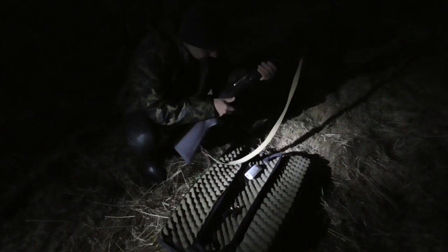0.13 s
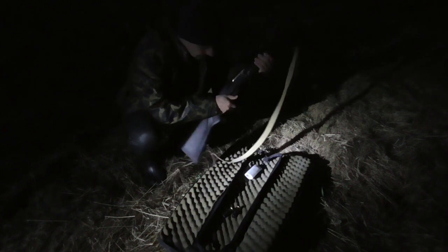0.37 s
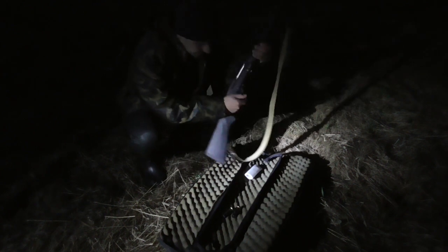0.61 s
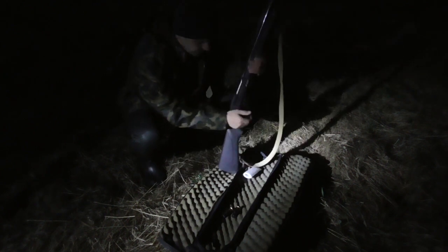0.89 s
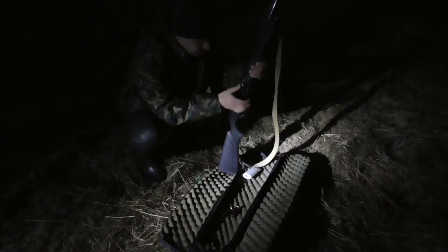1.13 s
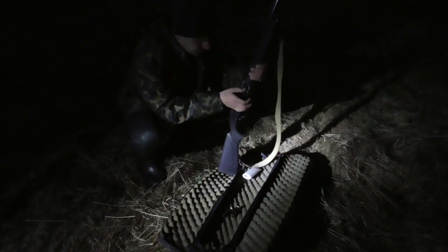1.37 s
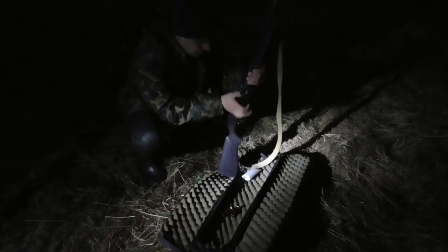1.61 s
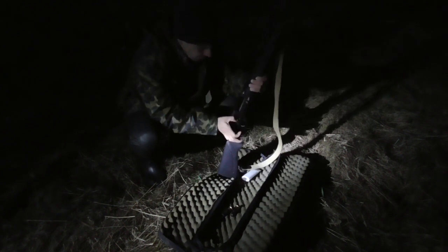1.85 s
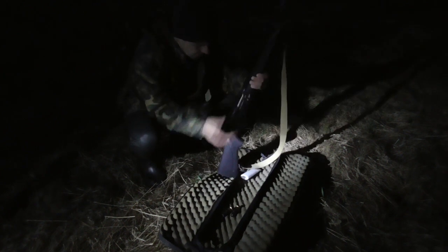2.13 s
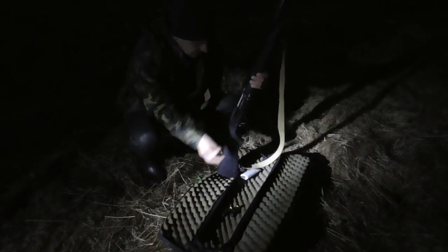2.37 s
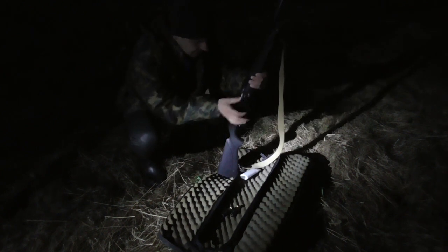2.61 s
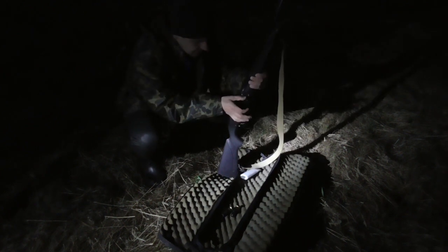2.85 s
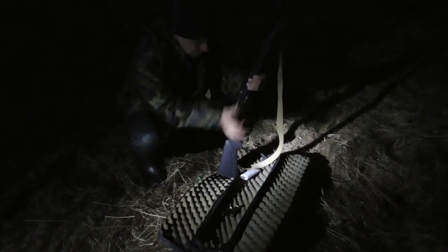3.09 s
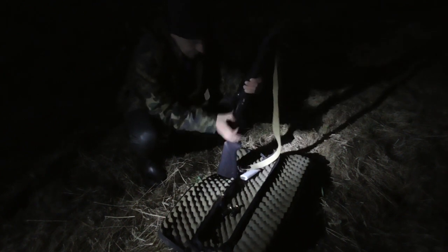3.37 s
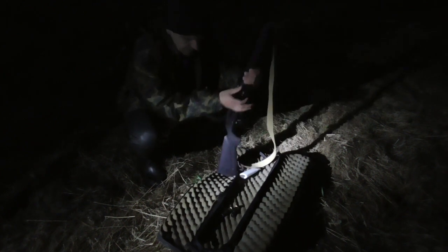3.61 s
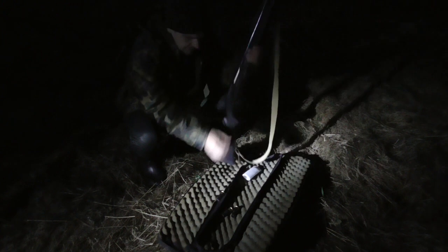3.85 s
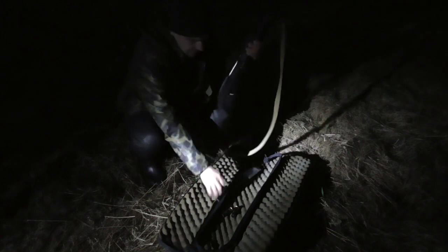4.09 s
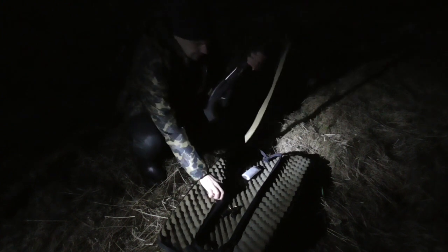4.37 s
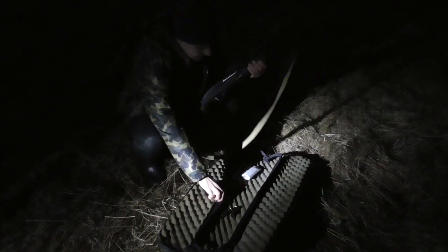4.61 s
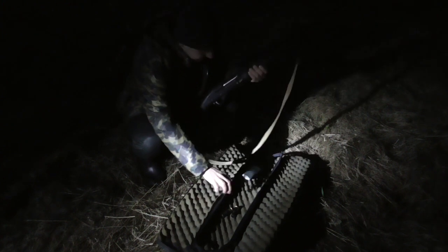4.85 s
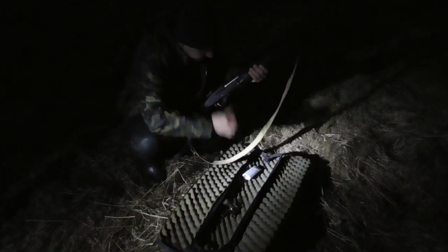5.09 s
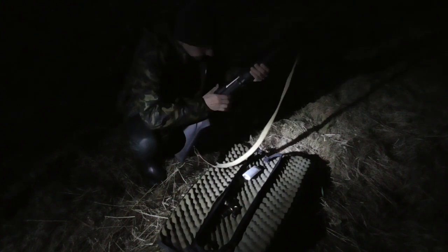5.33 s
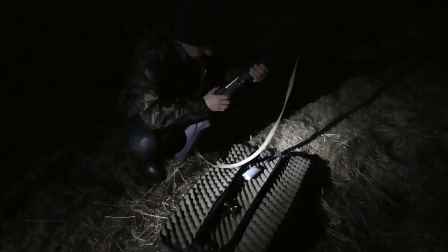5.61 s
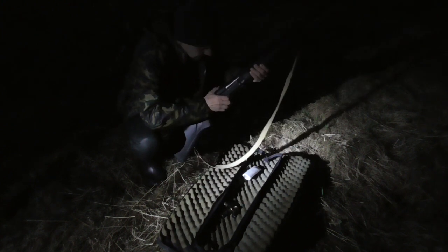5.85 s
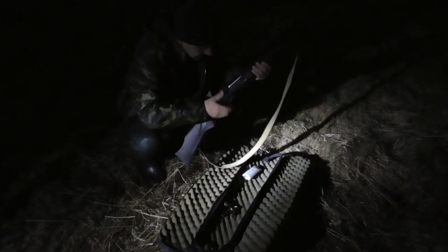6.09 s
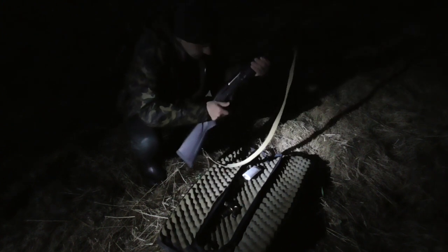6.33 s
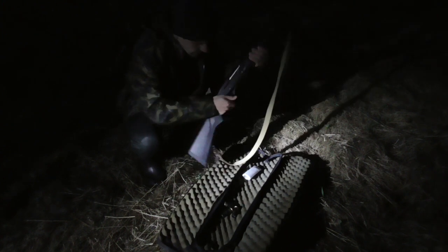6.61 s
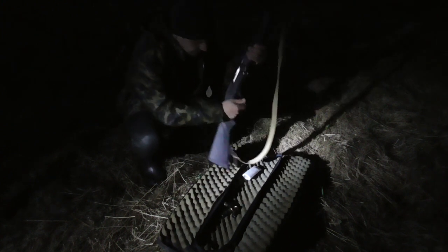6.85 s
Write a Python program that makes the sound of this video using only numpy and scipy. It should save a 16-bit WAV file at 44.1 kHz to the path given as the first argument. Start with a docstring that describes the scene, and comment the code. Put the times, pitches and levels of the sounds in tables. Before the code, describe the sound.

Quiet rustling of sleeves and grass, then two pairs of loud, crisp metal clacks as a gun's action is pulled and released. A calmer stretch follows with fabric swishes and a small dull tap with clicks on foam. A single hard metallic snap closes the action, and rustling resumes. Close wide stereo outdoors, dry with barely any tail, faint birds far off.

```python
"""Shotgun handling outdoors at night

A kneeling person works the bolt of a shotgun twice, drops shells on a foam mat and closes the action.
Each steel contact is a short chatter of micro-impacts through the gun's modes; decaying sines add rings.
Sleeves and shuffling are grainy banded noise; far bird notes are gliding near sines with echoes.
A soft wide hush of banded noise lies under it all.
"""
import sys
import numpy as np
from scipy import signal
from scipy.io import wavfile

SR = 44100
rng = np.random.default_rng(int(sys.argv[2]) if len(sys.argv) > 2 else 0)


def undo_db(level):
    """Turn decibels back into plain size, where 20 dB means ten times bigger."""
    steps = np.asarray(level, float) / 20
    return 10 ** steps


def generate_wav(sig):
    """Save sig (samples, or channels by samples) to the path in sys.argv[1] as 16-bit PCM at SR."""
    pcm = np.round(np.clip(np.atleast_2d(sig).T, -1, 1) * 32767).astype(np.int16)
    wavfile.write(sys.argv[1], SR, pcm)


N = 307180

# steel contacts: t/s, force/dB, hardness/dB (raises small parts, lowers barrel and stock), chatter length/s
CONTACTS = [(0.8473, -60.5, -8.5, 0.023), (1.003, -67, -2, 0.018), (1.472, -51.5, -1.5, 0.025),
            (1.57, -63.5, -1, .012), (1.626, -62.5, -3, 0.022), (1.644, -69.5, -16, 0.046),
            (1.697, -51, -6, 0.14), (1.7242, -26.5, 3.5, 0.039), (1.73, -33.5, -0.5, 0.079),
            (1.7397, -28.5, 5.5, 0.041), (1.7639, -33, 7, 0.039), (1.782, -42, 2, 0.06),
            (1.798, -45.5, 0.5, 0.25), (1.8086, -33.5, 2.5, 0.04), (1.8182, -26, 4, 0.022),
            (1.8218, -25.5, 4.5, 0.024), (1.9778, -50, 1.5, 0.027), (1.9983, -30.5, 3.5, 0.025),
            (2.011, -28.5, -2, 0.14), (2.02, -32, 4.5, 0.068), (2.0318, -26.5, -1.5, 0.036),
            (2.0361, -31, 7.5, 0.027), (2.051, -46.5, -8.5, 0.12), (2.0612, -29, 1.5, 0.04),
            (2.078, -34, 5.5, 0.13), (2.084, -26.5, 0, 0.079), (2.0986, -24, 8.5, 0.025),
            (2.1045, -28, 7, 0.039), (3.08, -52, -6, 0.046), (3.11, -55, -4.5, 0.061),
            (3.1262, -32.5, 0, 0.046), (3.1353, -24, 4.5, 0.019), (3.1408, -28, 5, .048),
            (3.151, -27.5, 3.5, 0.068), (3.157, -35, 3.5, 0.062), (3.1681, -34.5, 8.5, 0.038),
            (3.1865, -41.5, 4, 0.057), (3.2077, -34.5, 3.5, .03), (3.2092, -30, 4.5, 0.029),
            (3.215, -27, -1, 0.043), (3.2175, -26.5, 3.5, 0.025), (3.4008, -34.5, 5.5, 0.032),
            (3.409, -29, 0.5, 0.019), (3.418, -42.5, 1, 0.055), (3.444, -44, 3, 0.096),
            (3.476, -45, 0, 0.077), (3.4892, -33, 1, 0.062), (3.504, -31.5, 7, 0.09),
            (3.5103, -27, -5, 0.059), (3.5185, -31, 8, 0.037), (3.5267, -22.5, 7, 0.027),
            (3.5365, -38, 5, 0.045), (4.181, -63.5, 5, 0.025), (5.054, -41, -0.5, 0.0067),
            (5.061, -48, 4, 0.012), (5.065, -50, 9, 0.018), (5.0708, -52, 7, 0.02),
            (5.0758, -50.5, 0, 0.029), (5.084, -54, 2.5, 0.045), (5.132, -62.5, 10, 0.019),
            (5.1665, -64, 9, 0.02), (5.188, -60, 11, 0.028), (5.863, -50, -8, 0.066),
            (5.868, -26.5, 6, 0.02), (5.8732, -39, 10, 0.035), (5.8773, -44, 2.5, 0.035),
            (5.8808, -31.5, -1.5, 0.043), (5.8896, -38, 1.5, 0.038), (6.011, -46, 6.5, 0.017)]


def rms_one(x):
    """Scale to rms 1."""
    return x / np.sqrt(np.mean(x ** 2) + 1e-20)


def at_hz(points, hz):
    """Read a table on a log-frequency axis."""
    table_hz, values = np.transpose(points)
    return np.interp(np.log(hz), np.log(table_hz), values)


def drift(rate_hz):
    """Slow chance of spread 1: twice low-passed noise, one value per 40 samples, interpolated."""
    r = np.exp(-80 * np.pi * rate_hz / SR)
    white = rng.standard_normal(N // 40 + 2002)
    slow = signal.lfilter([1], [1, -2 * r, r * r], white)[2000:]  # skip the run-in
    return np.interp(np.arange(N) / 40, np.arange(len(slow)), rms_one(slow))


def grains(spread_db):
    """Two rows of noise whose samples differ widely in size; rms 1."""
    size = undo_db(spread_db * np.minimum(rng.exponential(1, (2, N)), 5))
    return rms_one(size * rng.standard_normal((2, N)))


def banded(white, spectrum, likeness, patchy_db):
    """Half-octave bands of stereo noise with own level, flicker and left-right likeness; rms 1."""
    out = 0
    edges_hz = 22 * 2 ** np.arange(0, 10, .5)
    for k, (low, high) in enumerate(zip(edges_hz, edges_hz[1:])):
        hz = np.sqrt(low * high)
        band_db = at_hz(spectrum, hz)
        if band_db < -45:
            continue
        band = signal.butter(2, [low, high], "band", fs=SR, output="sos")
        mid, side = signal.sosfilt(band, white[k % 2])
        alike = np.clip(at_hz(likeness, hz), -1, 1)
        gain = undo_db(band_db + patchy_db * drift(14))
        out = out + gain * (np.sqrt(1 + alike) * mid + np.sqrt(1 - alike) * side * [[1], [-1]])
    return rms_one(out)


def gun():
    """The chatter strikes every mode, each with a strength and pitch of its own per contact."""
    # modes of the gun: f/Hz, width/Hz, level/dB
    modes = [(90, 330, -2.5), (241, 810, 3), (680, 320, -3.5), (1050, 310, -3), (1395, 160, 0),
             (2130, 370, 0.5), (3080, 1800, -0.5), (3800, 560, 1), (4300, 440, -1.5), (5000, 660, 1),
             (5640, 1400, 0.5), (6590, 770, -2.5), (7260, 720, 1), (7810, 2400, -1.5), (9420, 720, -1),
             (10230, 710, -1.5), (11300, 560, -0.5), (12320, 880, -3.5), (13300, 1200, -5),
             (14800, 1700, -12.5)]
    # borders between thud, barrel and stock, receiver, small parts: f/Hz
    part_edges_hz = [400, 2700, 6000]
    # stereo side over mid: f/Hz, level/dB
    side_levels = [(60, -2), (180, 0.5), (550, -6.5), (1650, -22), (4970, -13), (15000, -8)]
    # share of the side that follows the mid: f/Hz, share
    side_lean = [(200, 0.4), (550, .01), (4000, .01), (9000, -0.49)]
    part_gain_db = [-1.5, -5.5, -1.5, -1.5]  # barrel and stock are set lower than the rest
    part_linger = [1.0, 2.06, 1.16, 0.92]  # barrel and stock shake longest
    stock_below_hz, lifted_s, free_stock_db = 800, 4.0, 6  # the stock sounds louder off the foam
    clump_db = 1.8  # micro-impacts come in clumps a millisecond or two long
    shift_share = .025  # parts sit differently at each contact, which shifts the modes

    out = np.zeros((2, N))
    impacts = rms_one(grains(3.5) * undo_db(clump_db * drift(300)))
    luck, shift = rng.standard_normal((2, len(CONTACTS), len(modes)))
    for k, (hz, width_hz, mode_db) in enumerate(modes):
        part = int(np.searchsorted(part_edges_hz, hz))
        times, blow_db, lengths_s = part_blows(part)
        count = len(times)
        if part == 1 and hz < stock_below_hz:
            blow_db = blow_db + free_stock_db * (times > lifted_s)
        level_db = blow_db + mode_db + part_gain_db[part] + 1.6 * luck[:count, k]
        shaking, strikes = chatter(times, level_db, lengths_s, part_linger[part])
        drive = impacts * shaking + strikes * [[1], [0]]  # strikes feed the mid alone
        starts = np.round(times * SR).astype(int)
        mid, apart = resonate(drive, starts, hz * (1 + shift_share * shift[:count, k]), width_hz)
        lean = np.clip(at_hz(side_lean, hz), -1, 1)
        side = undo_db(at_hz(side_levels, hz)) * (lean * mid + np.sqrt(1 - lean ** 2) * apart)
        polarity = (-1) ** max(k, 1)  # alternates above the two lowest modes
        out += polarity * np.array([mid + side, mid - side])
    return out + rings()


def part_blows(part):
    """Times, levels and chatter lengths at one part: hard contacts favour small parts over barrel and stock."""
    # thuds as the whole gun or a shell jolts against the mat: t/s, level/dB
    thuds = [(0.85, -59.5), (1.696, -60), (1.7236, -42), (1.822, -55.5), (2.011, -55.5), (2.035, -49.5),
             (2.059, -55), (2.0989, -41), (2.48, -68), (3.083, -61), (3.136, -49.5), (3.2072, -38.5),
             (3.215, -44.5), (3.448, -49), (3.508, -41), (3.525, -40.5), (5.054, -64), (5.068, -58),
             (5.084, -62.5), (5.8692, -35)]
    if part == 0:
        times, level_db = np.transpose(thuds)
        return times, level_db, np.full(len(times), 0.042)
    times, force_db, hardness_db, lengths_s = np.transpose(CONTACTS)
    return times, force_db + (part - 2) * hardness_db, lengths_s


def chatter(times, level_db, lengths_s, linger):
    """Envelope and first strikes: each contact cuts the last short; sharp blows crack, long slides swell in."""
    hold_power = 1.2  # above 1 a chatter holds at first, then drops faster
    rattle_db, rattle_t60_s = -26, 0.12  # loose parts go on rattling after each contact
    strike_db = 14  # first metal-to-metal touch, one sample, over the chatter that follows
    main, rattle, strikes = np.zeros((3, N + 6000))
    t = np.arange(6000) / SR
    for s, db, length_s in zip(times, level_db, lengths_s):
        at = round(s * SR)
        span = slice(at, at + len(t))
        slide = np.clip((length_s - .045) / 0.029, 0, 1)  # 0 sharp blow, 1 long slide
        rise = 1 - np.exp(-t / (.0001 + 0.002 * slide))
        crack = 1 + 0.71 * (1 - slide) * np.exp(-t / 0.001)
        fall_db = 20 * (3 * t / (max(length_s, .004) * linger)) ** hold_power
        before = main[at] * np.exp(-t / 0.00088)
        main[span] = before + rise * crack * undo_db(db - fall_db)
        rattle[span] += undo_db(db + rattle_db - 60 * t / rattle_t60_s)
        strikes[at + 8] = (1 - slide) * undo_db(db + strike_db)
    return (main + rattle)[:N], strikes[:N]


def resonate(x, starts, pitches_hz, width_hz):
    """Resonance that keeps the rms of white noise and takes a new pitch at each start sample."""
    r = np.exp(-np.pi * width_hz / SR)
    b = np.sqrt((1 - r * r) / 2) * np.array([1, 0, -1])
    out, state = np.zeros_like(x), np.zeros((2, 2))
    for start, end, hz in zip(starts, [*starts[1:], N], pitches_hz):
        a = [1, -2 * r * np.cos(2 * np.pi * hz / SR), r * r]
        out[:, start:end], state = signal.lfilter(b, a, x[:, start:end] + 1e-18, zi=state)
    return out


def rings():
    """Blows leave decaying sines, one or several at once, from short dull knocks to long clear tones."""
    # rings, depending on where the hands damp the gun: t/s, f/Hz, level/dB, t60/s
    ring_table = [(.964, 900, -49, .03), (1.003, 764, -43.5, .035), (1.0505, 800, -42, .014),
                  (1.8215, 1404, -28, .05), (1.822, 985, -60, .58), (1.822, 1389, -62, .6),
                  (2.0983, 1922, -56.5, .37), (3.0805, 900, -44, .03), (3.5105, 1400, -27, .06),
                  (3.526, 2218, -52, .16), (4.445, 250, -54, .058), (5.0545, 900, -39, .012),
                  (5.062, 520, -39, .05), (5.066, 200, -45, .12), (5.0755, 400, -44, .04),
                  (5.867, 170, -36, .05), (5.8666, 1880, -26.5, .063), (5.8685, 689, -21.5, .05),
                  (5.8685, 976, -35, .08), (5.8685, 2130, -23.5, .033), (5.8686, 3780, -28.5, .088),
                  (5.8687, 415, -46, .37), (5.8693, 1340, -16, .037), (5.8696, 1345, -57, .5),
                  (5.8696, 3990, -25, .076)]
    rise_s = 0.00047
    loud_db, grip_s, grip_t60_s = -35, .028, .04  # hands tighten and choke the loud rings
    out, t = np.zeros(N), np.arange(SR // 2) / SR
    for s, hz, db, t60_s in ring_table:
        at = round(s * SR)
        choke_db = 60 * np.maximum(t - grip_s, 0) / grip_t60_s * (db > loud_db)
        envelope = (1 - np.exp(-t / rise_s)) * undo_db(db - 60 * t / t60_s - choke_db)
        out[at:at + len(t)] += envelope * np.sin(2 * np.pi * hz * t)
    return out * undo_db(2.5 * drift(60))


def scatter(x, level_db, t60_s):
    """The surroundings return a short diffuse tail, unrelated in the two channels."""
    t = np.arange(int(.3 * SR)) / SR
    tails = rng.standard_normal((2, len(t))) * undo_db(-60 * t / t60_s) * (t > .004)
    tails /= np.sqrt(np.sum(tails ** 2, axis=1, keepdims=True))
    return undo_db(level_db) * signal.fftconvolve(x, tails, axes=1)[:, :N]


def clothes():
    """Fibres catching give grainy noise: bright strokes that swell and fade, and a dull shuffle."""
    # sleeve strokes: start/s, end/s, swish level/dB
    strokes = [(0.287, 1.077, -63), (1.374, 1.763, -75), (2.125, 2.378, -68), (2.56, 2.743, -72),
               (2.883, 3.107, -76.5), (3.595, 3.97, -68), (3.944, 4.148, -56), (4.008, 4.4, -62),
               (4.336, 4.609, -58), (4.55, 4.76, -69.5), (4.72, 4.901, -56), (4.913, 5.416, -61),
               (5.39, 5.764, -73), (6.022, 6.266, -56), (6.295, 6.436, -67.5), (6.361, 6.98, -57.5)]
    # knees and hands on grass and foam: t/s, level/dB
    shuffling = [(0, -68.5), (.55, -63), (1.0, -61), (1.25, -66), (1.6, -61.5), (1.9, -72), (2.3, -72.5),
                 (3.0, -65), (3.3, -78.5), (3.75, -71), (4.1, -59.5), (4.6, -62.5), (4.85, -61),
                 (5.5, -66.5), (6.15, -62.5), (6.4, -65), (6.7, -62), (6.96, -65.5)]
    # swish spectrum: f/Hz, relative level per Hz/dB
    swish_spectrum = [(880, -26.5), (1500, -8), (2610, -5.5), (3150, -4.5), (5120, 1.5), (8320, -6),
                      (11200, 3), (14600, -11), (16000, -23)]
    # shuffle spectrum: f/Hz, relative level per Hz/dB
    shuffle_spectrum = [(59, -36), (100, -10), (171, -3), (517, 0.5), (1110, -5), (1910, -24),
                        (2500, -22.5), (3250, -35.5), (5500, -120)]
    # left-right likeness: f/Hz, correlation
    likeness = [(60, -0.31), (240, -0.47), (950, 0.88), (3770, 0.81), (15000, 0.59)]

    t = np.arange(N) / SR
    power = np.zeros(N)
    for start, end, db in strokes:
        u = np.clip((t - start) / (end - start), 0, 1)
        power += undo_db(2 * db) * np.sin(np.pi * u) ** 1.63
    fibres = np.array([grains(2.6), grains(2.6)])
    flicker = undo_db(1.3 * drift(25) + .8 * drift(150))
    swish = np.sqrt(power) * flicker * banded(fibres, swish_spectrum, likeness, patchy_db=1.9)
    shuffle_gain = undo_db(np.interp(t, *np.transpose(shuffling)))
    shuffle = shuffle_gain * banded(fibres, shuffle_spectrum, likeness, patchy_db=1.4)
    return swish + shuffle


def birds():
    """Each note is an unsteady near sine gliding from one pitch to another; trees smear it with echoes."""
    # bird notes and other faint whistles: t/s, length/s, start f/Hz, end f/Hz, level/dB
    whistles = [(0.114, 0.038, 3470, 3000, -64.5), (1.02, 0.29, 6400, 6930, -68.5),
                (2.99, 0.022, 3450, 3960, -74), (3.035, .02, 3340, 3020, -72),
                (3.33, 0.18, 2500, 2530, -69.5), (4.01, 0.024, 1100, 1100, -61.5),
                (3.697, 0.048, 3800, 4050, -69), (3.725, 0.026, 4120, 3800, -67),
                (4.502, 0.066, 3110, 3090, -69.5), (5.03, 0.026, 4780, 3950, -62),
                (5.251, 0.069, 1620, 1550, -69), (5.422, 0.013, 4610, 7700, -75.5),
                (5.484, 0.16, 4690, 1924, -66), (5.495, 0.029, 4900, 3440, -62.5),
                (5.57, 0.063, 4180, 4050, -74), (5.609, 0.016, 4880, 7950, -74),
                (5.639, .008, 8000, 5600, -75), (5.645, 0.039, 4050, 4510, -70.5),
                (5.63, 0.15, 1847, 1473, -74), (5.697, 0.017, 4900, 8040, -75),
                (5.735, 0.043, 4470, 3650, -74.5), (5.78, 0.13, 2760, 2730, -73.5),
                (5.96, 0.056, 3800, 3660, -65), (6.234, 0.039, 5000, 3490, -65),
                (6.268, 0.046, 3500, 4850, -62), (6.263, 0.032, 3080, 3050, -65),
                (6.34, 0.02, 4190, 4500, -59), (6.505, 0.05, 3000, 3950, -66)]
    # short falling chirps, alike but for pitch and level: t/s, start f/Hz, level/dB
    chirps = [(.528, 4100, -67), (0.552, 4600, -61.5), (.582, 4800, -60), (.623, 4600, -63),
              (.634, 4850, -59.5), (0.762, 4970, -59), (0.774, 5000, -62), (0.881, 5500, -60),
              (4.238, 4780, -62), (4.306, 4850, -60.5)]
    chirp_s, chirp_fall_octaves = 0.012, 0.6
    rush_per_octave = 2.0  # wide glides cover most of their way early

    notes = list(whistles)
    for s, hz, db in chirps:
        notes.append((s, chirp_s, hz, hz * 2 ** -chirp_fall_octaves, db))
    out, waver = np.zeros((2, N)), undo_db(2.5 * drift(120))
    pans_db = rng.uniform(-3, 3, len(notes))
    for (s, length_s, start_hz, end_hz, db), pan_db in zip(notes, pans_db):
        u = np.linspace(0, 1, round(length_s * SR))
        rush = rush_per_octave * abs(np.log2(start_hz / end_hz))
        way = np.expm1(-rush * u) / np.expm1(-rush)  # nan for a level note, where 1 ** nan = 1
        hz = start_hz * (end_hz / start_hz) ** way
        swell = np.sqrt(2) * undo_db(db) * np.sin(np.pi * u) ** .5
        note = swell * np.sin(2 * np.pi * np.cumsum(hz) / SR)
        at = round(s * SR)
        out[:, at:at + len(u)] += note * undo_db(np.array([[pan_db], [-pan_db]]))
    calls = out * waver
    return calls + scatter(calls, level_db=-3, t60_s=.4)


def night():
    """Soft wide hush: steady noise whose bands flicker separately."""
    # hush spectrum: f/Hz, relative level per Hz/dB
    spectrum = [(15, -49), (25, -17.5), (80, -7), (373, -22), (659, -12), (1400, -3), (1890, -15.5),
                (2160, -11), (5880, -19.5), (11300, -17.5), (16000, -21.5)]
    # left-right likeness: f/Hz, correlation
    likeness = [(60, -0.28), (240, -0.95), (950, -0.46), (3770, 0.35), (15000, -0.12)]
    white = rng.standard_normal((2, 2, N))
    return undo_db(-66) * banded(white, spectrum, likeness, patchy_db=-1.65)


def scene():
    """Gun with its tail, clothes, birds and the night hush."""
    steel = gun()
    tail = scatter(steel, level_db=-23.5, t60_s=0.25)
    return steel + tail + clothes() + birds() + night()


def band_limit(x):
    """A steep low-pass at the top of the band."""
    return signal.sosfilt(signal.butter(12, 16800, fs=SR, output="sos"), x)


def record(dry):
    """The highest peaks are rounded and the top is cut, 60 dB down from 16.9 kHz."""
    rounded = .9 * np.tanh(dry / .9)
    top_cut = signal.cheby2(10, 60, 16900, fs=SR, output="sos")
    return band_limit(signal.sosfilt(top_cut, rounded))


dry = scene()
out = record(dry)
generate_wav(out)
```